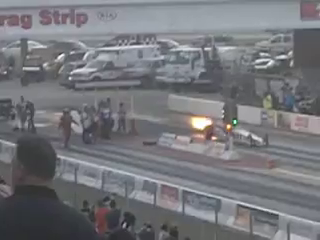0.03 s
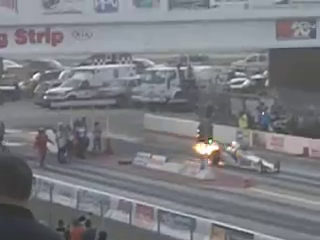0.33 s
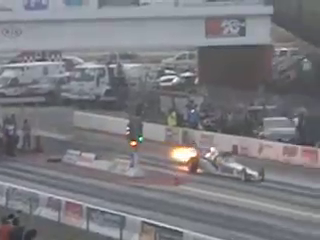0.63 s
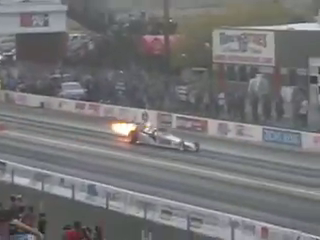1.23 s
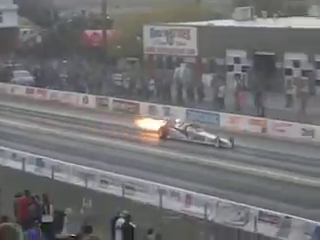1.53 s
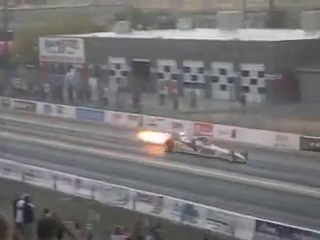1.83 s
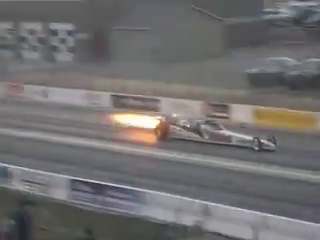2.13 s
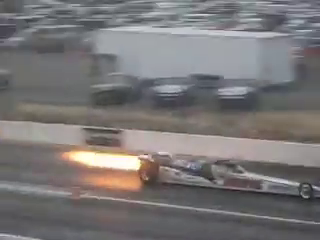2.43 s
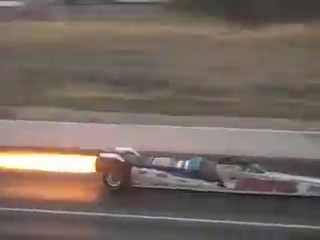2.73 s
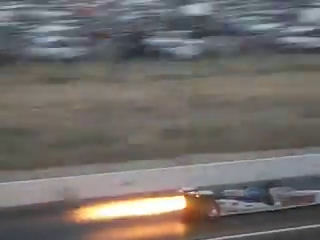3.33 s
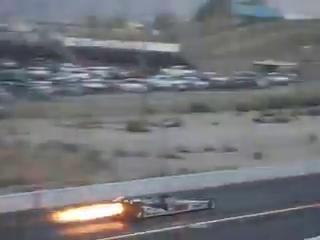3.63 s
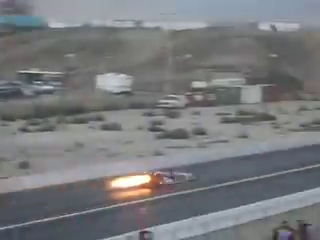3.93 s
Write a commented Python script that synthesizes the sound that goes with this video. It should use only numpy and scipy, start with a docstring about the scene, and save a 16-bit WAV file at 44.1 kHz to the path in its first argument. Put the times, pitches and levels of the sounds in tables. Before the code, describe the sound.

A jet dragster roars as it launches and speeds past, overloading the microphone.

```python
"""A jet dragster launches on afterburner and passes close to a microphone in the stands.
First come the hiss of the compressor, the rumble of the flame and a throbbing exhaust roar.
As the car nears, the hiss fades, turbine whines sink in pitch, and twice the sound jumps and clips flat.
Around 3 s the car is alongside: the exhaust tears and overloads the microphone lopsidedly.
Last, the roar deepens and fades as the tail turns towards us."""
import sys
import numpy as np
from scipy import signal
from scipy.fft import rfft, irfft
from scipy.io import wavfile
from scipy.ndimage import uniform_filter1d

SR = 44100
rng = np.random.default_rng(int(sys.argv[2]) if len(sys.argv) > 2 else 0)


def transcribe(u):
    """Save the signal u as a 16-bit wav file named by the first command-line argument.

    u: samples, shape (n,) or (channels, n), limited to [-1, 1]; the rate is SR.
    q: integer samples, one column per channel.
    """
    v = np.clip(np.atleast_2d(u).T, -1, 1)
    q = np.round(v * 32767).astype(np.int16)
    wavfile.write(sys.argv[1], SR, q)


N = 176400
TIME = np.arange(N) / SR
HZ = np.fft.rfftfreq(N, 1 / SR)

# How loud the exhaust is (time [s], level [dB])
ROAR_LEVEL = [(0, -18), (.09, -25), (.24, -22), (.32, -22), (.9, -21.5), (1.1, -20), (1.33, -22),
              (1.72, -18.5), (1.87, -19.5), (1.98, -17.5), (2.15, -18.5), (2.44, -15.5), (2.7, -9.5),
              (2.83, -6), (3.0, -1.5), (3.27, -0.5), (3.53, -5.5), (3.62, -10), (3.7, -6), (3.8, -15),
              (3.9, -17.5), (4, -21.5)]
# Which side of the jet faces us (time [s], side [0 or less = nose ... 5 = far tail])
FACING_SIDE = [(0, 1.5), (.7, 1), (1.03, -9.5), (1.86, 3), (1.93, 2), (2.38, 2.5), (2.5, 3), (2.75, 3),
               (3.17, 3), (3.31, 3.5), (3.43, 4), (3.72, 4), (3.84, 4.5), (4, 3)]
# Tone of the roar from each of the six sides (frequency [Hz], relative level [dB])
NOSE = [(30, -10.5), (190, -5.5), (400, -1), (900, 1), (1400, -1.5), (2200, -1), (3000, -3.5),
        (4000, -11.5), (5000, -21.5)]
FRONT = [(30, -19.5), (190, -11.5), (400, 0), (900, -2), (1400, 1), (2200, 1.5), (3000, -2.5), (4000, -8),
         (5000, -23.5)]
FRONT_QUARTER = [(30, -24), (190, -12.5), (400, 0.5), (900, -0.5), (1400, 0.5), (2200, 1), (3000, 2.5),
                 (4000, -4), (5000, -13.5)]
FLANK = [(30, -10), (190, -11.5), (400, -6.5), (500, -9.5), (700, -5.5), (1000, -10.5), (1400, -4),
         (2200, -1), (3000, -2), (4000, -6.5), (5000, -11)]
TAIL = [(30, -11), (190, -4.5), (300, -5.5), (450, -0.5), (900, -6), (1400, -6), (2200, -4), (3000, -10.5),
        (4000, -13), (5000, -18.5)]
FAR_TAIL = [(30, -10), (210, -18), (420, -1.5), (1000, -13.5), (1400, -8), (2200, -6.5), (3000, -12),
            (4000, -18), (5000, -26)]
# Peaks and dips from sound bouncing off the track and stands (frequency [Hz], gain [dB])
REFLECTIONS = [(260, 1), (340, -1.5), (420, 2), (490, 3.5), (570, 1.5), (700, -5.5), (830, 2.5),
               (1040, -1.5), (1350, 2), (1600, -2), (1850, -0.5), (2030, -3), (2230, -1.5), (2480, -1.5),
               (2700, -0.5), (3200, -1)]
def exhaust(throb_db):
    """Swirling gas roars, and its tone changes as we hear the car from nose to tail."""
    sides = [NOSE, FRONT, FRONT_QUARTER, FLANK, TAIL, FAR_TAIL]
    noise = colour(turbulence(), REFLECTIONS)
    facing = np.clip(curve(FACING_SIDE), 0, len(sides) - 1)
    roar = np.zeros(N)
    for k, side in enumerate(sides):
        share = np.maximum(1 - abs(facing - k), 0)  # neighbouring sides blend
        roar += share * unit(colour(noise, side))
    return roar * amp(curve(ROAR_LEVEL) + throb_db)


def turbulence(depth_db=1.0):
    """Noise that swells and fades in short patches of pitch, like swirls in the jet."""
    bands = signal.stft(rng.standard_normal(N), nperseg=512, noverlap=384)[2]
    patches = uniform_filter1d(rng.standard_normal(bands.shape), size=9, axis=0)  # smooth over pitch
    patches = unit(uniform_filter1d(patches, size=10, axis=1))  # then over time
    return signal.istft(bands * amp(depth_db * patches), nperseg=512, noverlap=384)[1][:N]


# Strong throbs of the flame; below zero is a dip (time [s], strength [relative])
THROBS = [(0.164, 2.5), (0.315, 3.5), (0.378, 1.5), (0.48, 4), (0.531, 4), (0.611, -1.5), (0.681, 5.5),
          (0.759, 6.5), (0.869, 4), (0.96, 2.5), (1.037, 3.5), (1.1, 1), (1.174, 0), (1.301, 1.5),
          (1.422, 7), (1.459, 1.5), (1.505, 3.5), (1.581, 0.25), (1.633, 1.5), (1.749, 2.5), (1.941, 5.5),
          (1.995, 3.5), (2.06, 5), (2.169, 7.5), (2.27, 1.2), (3.83, -2.5)]
def flame_throb(width_s=.017, flutter_db=0.93):
    """Uneven burning moves the level, in dB: strong throbs over a quick random flutter."""
    throbs = sum(strength * np.exp(-((TIME - at) / width_s) ** 2) for at, strength in THROBS)
    return 0.62 * throbs + flutter_db * wander(rate_hz=30)


# How loud the rumble is (time [s], level [dB])
RUMBLE_LEVEL = [(0, -18.5), (.3, -22.5), (.8, -23), (1.5, -25.5), (1.85, -31.5), (2.38, -36), (2.52, -30.5),
                (2.8, -31.5), (3.3, -22), (3.65, -28), (4, -21.5)]
# Tone of the rumble (frequency [Hz], relative level [dB])
RUMBLE_TONE = [(15, -21.5), (28, -10.5), (40, -2), (68, -0.5), (102, -5), (140, -18.5), (200, -28),
               (400, -34.5)]
def afterburner(throb_db):
    """The flame rumbles low and swells with each throb."""
    rumble = unit(colour(rng.standard_normal(N), RUMBLE_TONE))
    return rumble * amp(curve(RUMBLE_LEVEL) + throb_db)


# Three whines, one list each (time [s], pitch [Hz], level [dB])
WHINES = [
    [(.22, 1830, -41.5), (.35, 1856, -36.5), (.65, 1820, -38.5), (.85, 1936, -41.5)],
    [(1.8, 2263, -44), (2.2, 2203, -29.5), (2.45, 2172, -27.5), (2.75, 2086, -24.5), (3.03, 1908, -12.5),
     (3.18, 1848, -9), (3.3, 1660, -20)],
    [(1.9, 2736, -31), (2.4, 2682, -33), (2.75, 2468, -25.5), (3.03, 2299, -10), (3.25, 2178, -19.5)],
]
def turbine():
    """Spinning blades whine: one faint tone at the launch, then two that sink as the car passes."""
    return sum(whistle(track, width_hz=24) for track in WHINES)


# Path of the hiss (time [s], centre pitch [Hz], level [dB])
HISS = [(0, 3870, -27.5), (.45, 3850, -25), (.75, 3634, -26.5), (.95, 3187, -30.5), (1.3, 2890, -27),
        (1.8, 2820, -51.5)]
def compressor(throb_db):
    """The compressor hisses ahead of the car, pulsing with the flame."""
    return whistle(HISS, width_hz=450) * amp(1.3 * throb_db)


def whistle(track, width_hz, shake_hz=65, fade_s=.03):
    """A band of noise that follows a track; close by, the jet's swirls shake its pitch."""
    roar_db = curve(ROAR_LEVEL)
    nearness = np.minimum(2 * amp(roar_db - roar_db.max()), 1)
    pitch_hz = curve(track) + shake_hz * nearness * wander(rate_hz=110)
    phase = 2 * np.pi * np.cumsum(pitch_hz) / SR
    band = wander(width_hz) * np.cos(phase) + wander(width_hz) * np.sin(phase)
    outside_s = abs(TIME - np.clip(TIME, track[0][0], track[-1][0]))  # time beyond the track's ends
    return band * amp(curve(track, column=2)) * np.exp(-outside_s / fade_s)


def amp(db):
    """Turns decibels into a gain to multiply by."""
    return 10 ** (np.asarray(db) / 20)


def unit(x):
    """Scales a signal to an average size (rms) of 1."""
    return x / np.sqrt(np.mean(x ** 2) + 1e-20)


def curve(points, column=1):
    """Joins a table's points with straight lines, one value per sample."""
    points = np.array(points)
    return np.interp(TIME, points[:, 0], points[:, column])


def colour(x, points):
    """Turns frequencies up or down by a table of (frequency [Hz], gain [dB])."""
    hz, db = np.transpose(points)
    gain_db = np.interp(np.log(HZ + 1), np.log(hz), db)
    return irfft(rfft(x) * amp(gain_db), N)


def wander(rate_hz):
    """Smooth random wobble, up to about the given rate."""
    keep_slow = np.exp(-(HZ / rate_hz) ** 2 / 2)
    return unit(irfft(rfft(rng.standard_normal(N)) * keep_slow, N))


def scene():
    """The whole engine, heard from the stands."""
    throb_db = flame_throb()
    return (exhaust(throb_db) + afterburner(throb_db) + turbine() + compressor(throb_db))[None]


# Sudden boosts into the microphone (start [s], end [s], first gain [dB], last gain [dB])
JUMPS = [(2.4565, 2.603, 13, 10), (2.625, 2.673, 15.5, 12)]
def level_jumps(release_s=.006):
    """Gain in dB: the level leaps at once, sags, and drops back quickly."""
    jump_db = np.zeros(N)
    for start, end, first_db, last_db in JUMPS:
        sag_db = np.interp(TIME, [start, end], [first_db, last_db])
        release = np.exp(-np.maximum(TIME - end, 0) / release_s)
        jump_db += (TIME >= start) * sag_db * release
    return jump_db


def microphone(x, limit=0.53, sharpness=6.9, lag_s=1):
    """Long loud sound pushes the microphone off centre, so one side of the wave is squashed more."""
    memory = np.exp(-1 / (lag_s * SR))
    recent_level = signal.lfilter([1 - memory], [1, -memory], abs(x))
    x = x + 0.57 * recent_level
    x = x / (1 + abs(x / limit) ** sharpness) ** (1 / sharpness)
    recentre = signal.butter(1, 22, "high", fs=SR, output="sos")  # cuts below 22 Hz
    return signal.sosfilt(recentre, x)


def clip_flat(x, bend_from=.66, ceiling=.745):
    """The overloaded recorder lets small waves through and flattens big ones."""
    headroom = ceiling - bend_from
    clean = np.clip(x, -bend_from, bend_from)
    return clean + headroom * np.tanh((x - clean) / headroom)


# How the recorder loses treble (frequency [Hz], gain [dB])
TREBLE_LOSS = [(2500, 1), (4300, -3), (5100, -4), (5400, -11), (5600, -18.5), (5850, -14.5), (6200, -36),
               (6600, -74), (7500, -87)]
# Tone of the sound after clipping (frequency [Hz], gain [dB])
CLIPPED_TONE = [(3000, 0.5), (5000, 1), (6200, -5.5), (8500, -4), (11000, -1.5), (15000, 0)]
def record(dry):
    """The microphone squashes the sound; the recorder dulls it, clips it and cuts the highest treble."""
    jump_db = level_jumps()
    x = microphone(dry[0] * amp(jump_db))
    x = colour(x, TREBLE_LOSS)
    x = clip_flat(x * amp(0.5 + 0.3 * jump_db))  # the jumps also lift the squashed sound
    x = colour(x, CLIPPED_TONE)
    top_cut = signal.firwin(511, cutoff=15800, window=("kaiser", 9), fs=SR)
    return signal.oaconvolve(x, top_cut, "same")[None]


dry = scene()
out = record(dry)
transcribe(out)
```